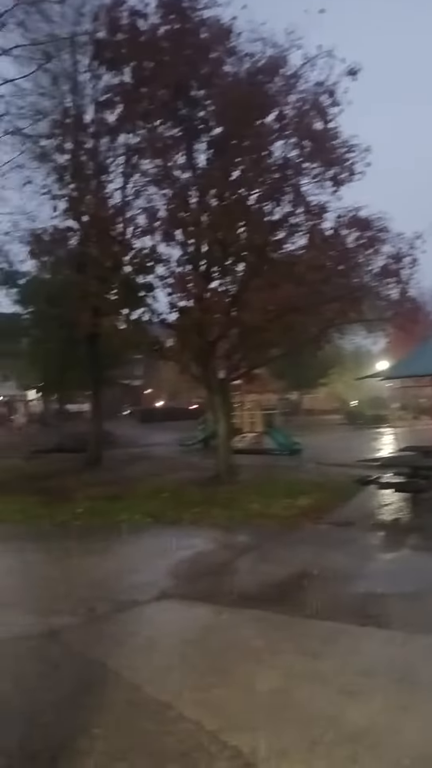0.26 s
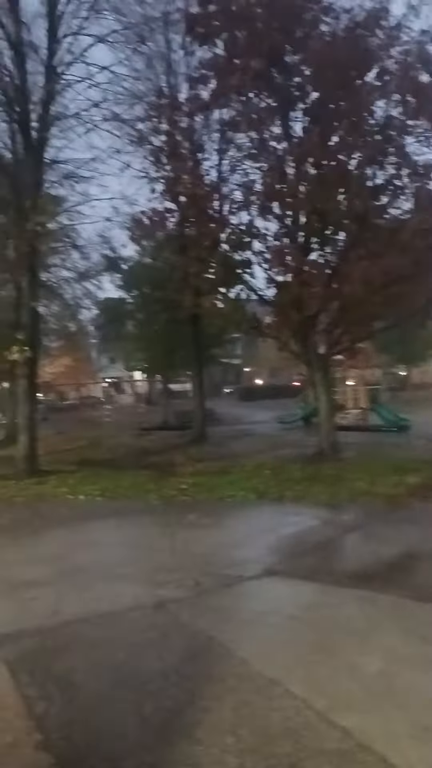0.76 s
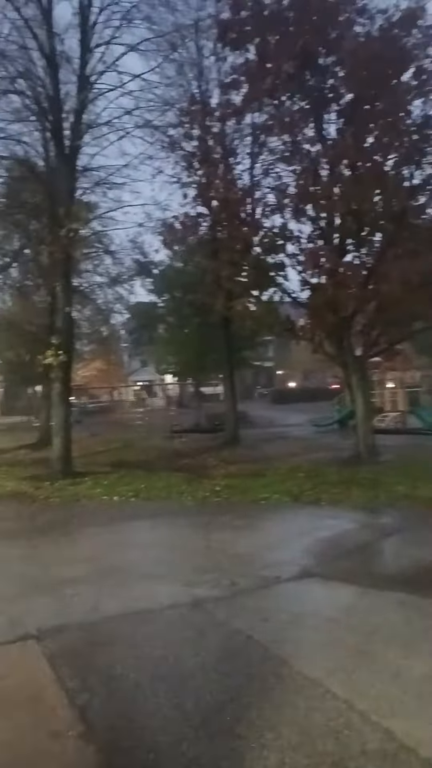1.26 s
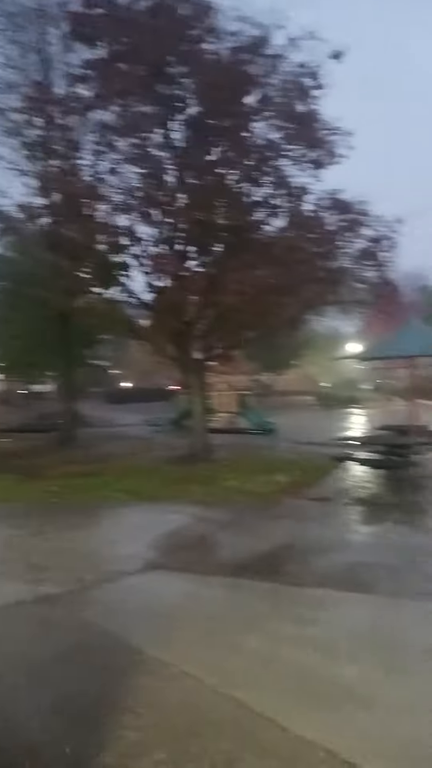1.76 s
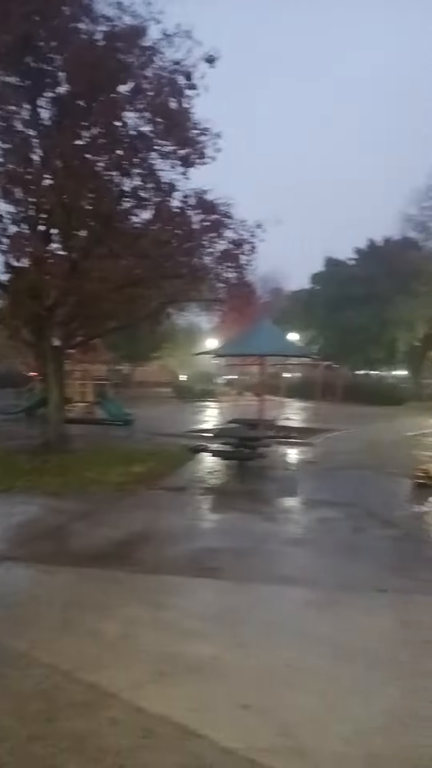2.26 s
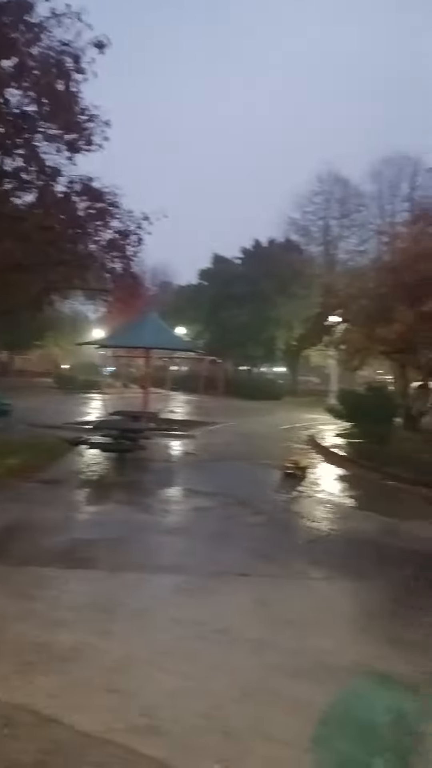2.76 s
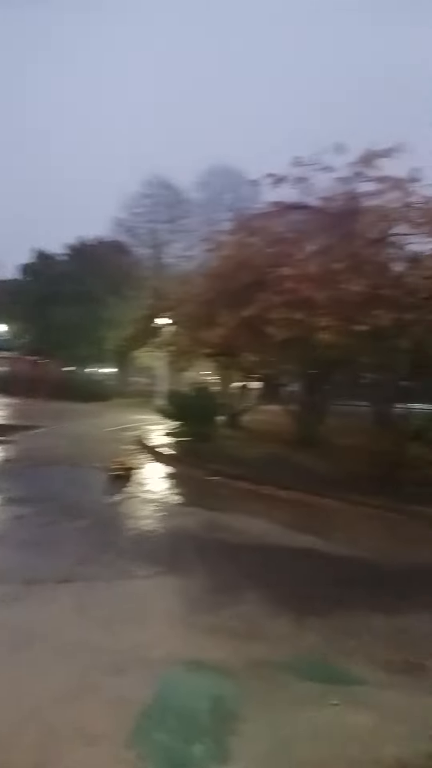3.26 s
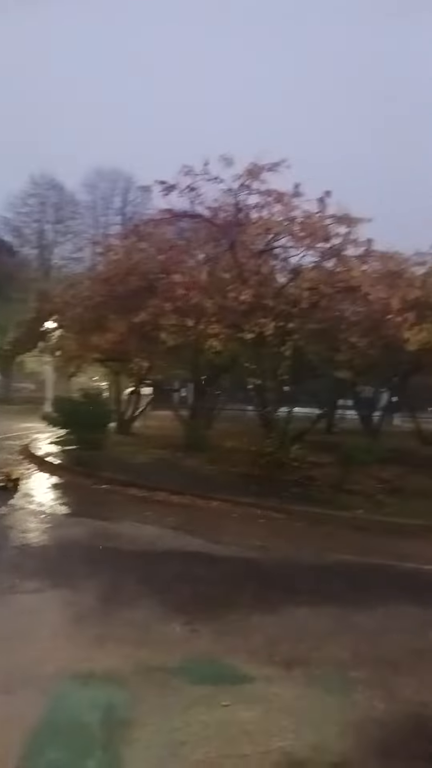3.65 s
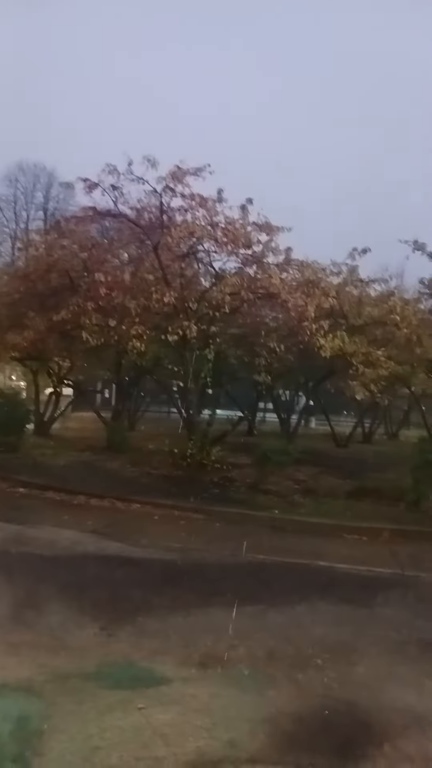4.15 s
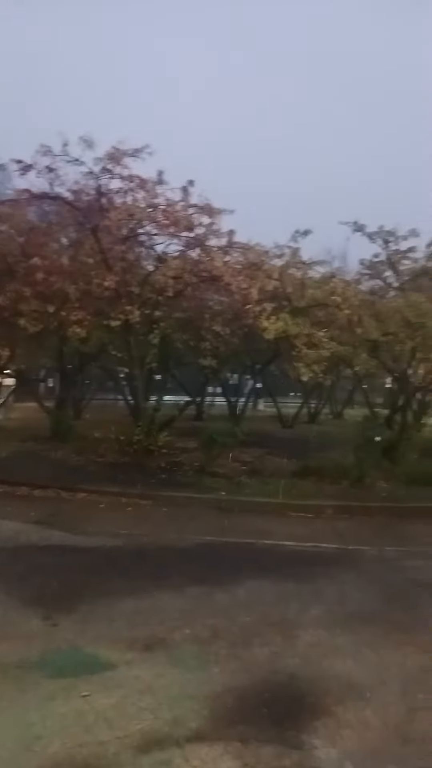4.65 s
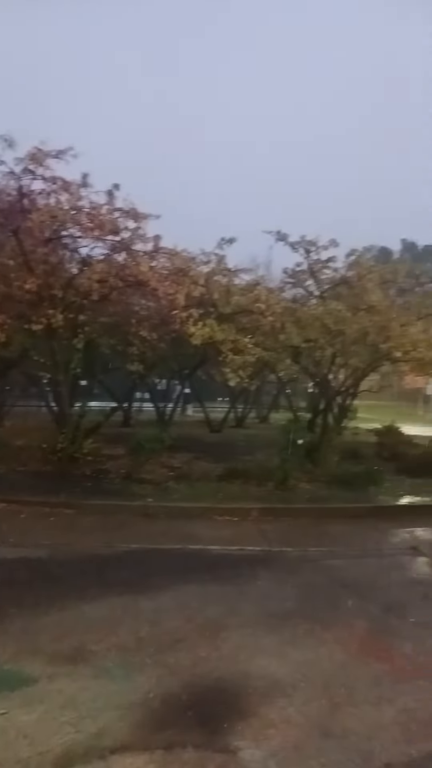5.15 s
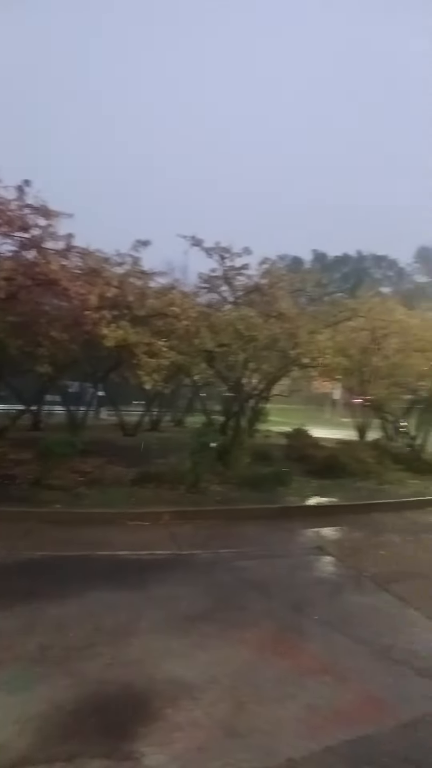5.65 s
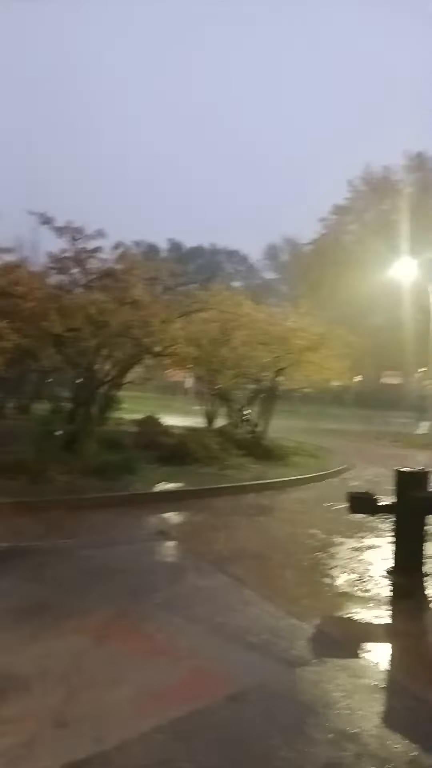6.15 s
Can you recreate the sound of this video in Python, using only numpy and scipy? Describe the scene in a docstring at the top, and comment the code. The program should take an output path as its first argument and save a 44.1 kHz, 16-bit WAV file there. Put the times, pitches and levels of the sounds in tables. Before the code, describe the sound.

Heavy rain falls on puddled park pavement as a continuous dense hiss, with fine patter and small crisp splashes nearby. A low rumble like distant traffic sways underneath. In the first second, a few drops strike the left microphone directly with sharp wet pops, briefly ducking the sound. That side has a ringing, slowly rising midrange tone; the right is more open. Light taps come later, then a hard knock near six seconds.

```python
"""Heavy rain on wet pavement

Rain falls in a park: noise for the far wash, ringing clicks for nearer drops, noise bursts for splashes.
Under it lies a low rumble like distant traffic, made of swaying low noise. The left microphone port is wet
and rings at a rising pitch; a few drops strike it directly and make the gain control duck. Near splashes
tick on the right, and a few taps, one of them hard, set the housing's modes ringing."""
import sys
import numpy as np
from scipy import signal
from scipy.fft import rfft, irfft
from scipy.io import wavfile
from scipy.ndimage import uniform_filter1d, minimum_filter1d

SR = 44100
rng = np.random.default_rng(int(sys.argv[2]) if len(sys.argv) > 2 else 0)


def generate_wav(sig):
    """Save sig (samples, or channels by samples) to the path in sys.argv[1] as 16-bit PCM at SR."""
    pcm = np.round(np.clip(np.atleast_2d(sig).T, -1, 1) * 32767).astype(np.int16)
    wavfile.write(sys.argv[1], SR, pcm)


N = 282240
TIME = np.arange(N) / SR
FREQS = np.maximum(np.fft.rfftfreq(N, 1 / SR), 1)  # Hz, kept above zero for logs and division


def from_db(db):
    """Decibels to gain."""
    return 10 ** (np.asarray(db) / 20)


def at_hz(table):
    """Spread each table column over all frequencies, interpolating on a log pitch axis."""
    hz, *columns = np.transpose(table)
    return np.array([np.interp(np.log(FREQS), np.log(hz), column) for column in columns])


def band(x, low_hz, high_hz, order=2):
    """Band-pass, its upper edge kept below the top of the spectrum."""
    edges = [low_hz, min(high_hz, .45 * SR)]
    return signal.sosfilt(signal.butter(order, edges, "band", fs=SR, output="sos"), x)


def drift(rate_hz):
    """Slow random wandering around zero with spread 1."""
    slow = irfft(rfft(rng.standard_normal(N)) / (1 + (FREQS / rate_hz) ** 2), N)
    return (slow - slow.mean()) / slow.std()


def ring(clicks, hz, t60):
    """A two-pole resonator: each unit click starts a sine of height 1 that falls 60 dB in t60 seconds."""
    radius = from_db(-60 / (t60 * SR))
    turn = 2 * np.pi * hz / SR
    poles = [1, -2 * radius * np.cos(turn), radius * radius]
    return signal.lfilter([0, np.sin(turn)], poles, clicks + 1e-18)  # tiny offset avoids denormals


def clicks_at(times, level_db):
    """Single-sample clicks at the given times in seconds."""
    out = np.zeros(N)
    out[np.round(np.asarray(times) * SR).astype(int)] = from_db(level_db)
    return out


# How alike the two ports hear the field: pitch_hz, correlation (0 to 1)
STEREO_LIKENESS = [(60, 0.96), (250, 1), (500, .62), (1000, .38), (2200, 0.23), (4000, 0.024)]


def coloured(white, spectrum, edge):
    """Two white signals become a stereo field: alike in the bass, unrelated in the treble."""
    angle = np.arcsin(np.clip(at_hz(STEREO_LIKENESS), 0, 1)) / 2
    bins = rfft(white)
    bins = np.cos(angle) * bins + np.sin(angle) * bins[::-1]  # bleed each side into the other
    return irfft(bins * from_db(at_hz(spectrum)) * edge, N) * np.sqrt(SR / 2)  # unit power to power per Hz


# Rumble colour, for unit-power noise before edges, sway and wet port:
# pitch_hz, left_db_per_hz, right_db_per_hz
RUMBLE_COLOUR = [(22, -61, -73), (34, -66, -63), (50, -49, -62), (68, -48, -56), (79, -58, -57),
                 (112, -53.5, -58.5), (153.6, -63.5, -64.5), (237, -67, -73.5)]


def rumble(sway_db=1.32, low_hz=27, high_hz=270):
    """Low-passed noise from far away: it sways slowly and swells gently once."""
    edge = 1 / np.sqrt((1 + (FREQS / high_hz) ** 8) * (1 + (low_hz / FREQS) ** 8))
    swell_at_s, swell_width_s, swell_peak_db = 2.55, 1.0, 1.5
    swell_db = swell_peak_db * np.exp(-((TIME - swell_at_s) / swell_width_s) ** 2)
    noise = coloured(rng.standard_normal((2, N)), RUMBLE_COLOUR, edge)
    return noise * from_db(swell_db + sway_db * drift(2.2))


# Blows on the housing, levels as fed to the resonators and filters:
# start_s, knock_db, deep_thump_db, contact_click_db, click_hz
TAP_BLOWS = [(1.887, -22, -25, -14, 700), (4.482, -20.5, -25, -14, 700), (6.0229, -15, -9.5, 13, 900),
             (6.0276, -12.5, -34, 12, 2900), (6.107, -19, -29, -14, 700), (6.320, -13, -21, -11, 700)]


def tap_clicks(span=2.27, right_db=-7.5, wet_low_hz=600, wet_high_hz=7500):
    """The contact of each tap sends a short click to both ports, duller on the wet side."""
    click = np.zeros(N)
    for s, _, _, click_db, hz in TAP_BLOWS:
        click += band(clicks_at(s, click_db), hz / span, hz * span, order=1)
    return np.array([band(click, wet_low_hz, wet_high_hz), from_db(right_db) * click])


# Ringing modes of the housing, on top of each knock's level: pitch_hz, level_db, t60_s
HOUSING_MODES = [(175, -12, .025), (295, 0.5, 0.043), (370, -1.5, 0.046), (705, -3, 0.0093),
                 (1150, -0.5, 0.0067)]


def taps(thump_t60=0.21, jolt_hz=200, jolt_db=14.0, right_db=-14.5):
    """Blows ring the housing; a heavy one jolts and shakes the whole body, pushing one port, pulling the other."""
    s, knock_db, thump_db, _, _ = np.transpose(TAP_BLOWS)
    knock = np.zeros(N)
    for k, (hz, mode_db, t60) in enumerate(HOUSING_MODES):
        knock += (-1) ** k * ring(clicks_at(s, knock_db + mode_db), hz, t60)  # modes alternate in sign
    push = clicks_at(s, thump_db)
    jolt = band(from_db(jolt_db) * ring(push, jolt_hz, 0.009), 86, 2500)
    shake = ring(push, 55, thump_t60) - ring(push, 68.5, thump_t60)  # two close modes swell, then die
    return (knock + jolt + shake) * np.array([[1], [-from_db(right_db)]])


def port_hz(s):
    """Pitch of the wet port: its water film settles quickly, then drains steadily, and the pitch rises."""
    start_hz, settle_hz, settle_s, creep_hz_per_s = 2094, 215, 0.85, 37
    return start_hz + settle_hz * (1 - np.exp(-s / settle_s)) + creep_hz_per_s * s


def cavity(x, hz, width_hz, size=256):
    """A resonant low-pass whose pitch may move from block to block."""
    radius = np.exp(-np.pi * width_hz / SR)
    out, state = np.zeros(N), np.zeros(2)
    for i in range(0, N, size):
        poles = [1, -2 * radius * np.cos(2 * np.pi * hz[i] / SR), radius * radius]
        out[i:i + size], state = signal.lfilter([sum(poles)], poles, x[i:i + size], zi=state)
    return out


def wet_port(x):
    """Water over the port rings in the midrange and muffles what lies above, up to the port's own high mode."""
    film = cavity(x, port_hz(TIME), width_hz=273)
    return cavity(film, np.full(N, 14500), width_hz=1900)


# Drops striking the left port, levels of the clicks before filtering: start_s, ring_db, crack_db
DIRECT_DROPS = [(.5450, 12, 2), (.7060, 14.5, -5), (0.8697, -1, -10), (1.2470, -5, -30)]


def port_drops(ring_t60=0.0095, halving_db=12.0, pitch_ratio=0.99, overtone_hz=4800, overtone_db=-13.0,
               overtone_growth=0.36, overtone_t60=0.0011, leak_db=-58.0):
    """A direct hit rings the wet port and its overtone under a tiny bright crack; the other port barely hears it.
    The harder the hit, the shorter and brighter the ring."""
    body, crack = np.zeros(N), np.zeros(N)
    for s, ring_db, crack_db in DIRECT_DROPS:
        click = clicks_at(s, ring_db)
        t60 = ring_t60 * .5 ** (ring_db / halving_db)
        overtone_gain = from_db(overtone_db + overtone_growth * ring_db)
        overtone = overtone_gain * ring(click, overtone_hz, overtone_t60)
        body += ring(click, pitch_ratio * port_hz(s), t60) - overtone
        crack += ring(clicks_at(s, crack_db), 14500, 0.00056)
    for _ in range(3):  # the tiny cavity passes almost nothing below its ring
        body = band(body, 1650, 8200)
    return (body + band(crack, 8600, 16000)) * from_db([[0], [leak_db]])


def patter(per_s, spread_db, cycles, count=18):
    """Random drops of uneven size; each rings a few cycles at one of many pitches, together roughly white."""
    out, pitches = np.zeros((2, N)), np.geomspace(700, 15000, count)
    for hz in pitches:
        share = np.sqrt(hz) / np.sqrt(pitches).sum()  # higher pitches get more drops
        born = rng.random((2, N)) < per_s * share / SR
        chance = rng.random((born.sum(), 2))
        size_db = spread_db * np.minimum(-np.log(chance[:, 0]), 4)
        clicks = np.zeros((2, N))
        clicks[born] = from_db(size_db) * np.sign(chance[:, 1] - .5)
        drops = ring(clicks, hz, cycles / hz)
        out += drops / drops.std() * np.sqrt(hz / pitches.sum())  # the pitches' powers add up to 1
    return out


def splashes(rows, span, t60, size=2048):
    """Each splash is a burst of spray that dies within milliseconds, heard a little differently at each port."""
    out = np.zeros((2, N + size))
    for s, level_db, hz in rows:
        burst = rng.standard_normal((2, size)) * from_db(level_db - 60 * TIME[:size] / t60)
        at = round(s * SR)
        out[:, at:at + size] += band(burst, hz / span, hz * span)
    return out[:, :N]


def spatter(level_db=4.5, spread_db=2.5, t60=0.025, left_db=-4.0, span=1.32, low_hz=2400, pitch_range=5.1,
            count=220):
    """Smaller splashes a few steps away: random band-passed bursts, more of them high than low."""
    when, size, pitch = rng.random((count, 3)).T
    hz = low_hz * pitch_range ** np.sqrt(pitch)
    level = level_db + spread_db * np.minimum(-np.log(size), 3.5)
    return splashes(np.column_stack([when * N / SR, level, hz]), span, t60) * from_db([[left_db], [0]])


# Rain colour, for unit-power noise before bass cut, flutter and wet port:
# pitch_hz, left_db_per_hz, right_db_per_hz
RAIN_COLOUR = [(324, -73.5, -71.5), (510, -71, -78), (930, -72.5, -73), (1150, -69.5, -74),
               (1500, -70, -70), (1940, -70, -65.5), (2380, -72.5, -72.5), (3640, -72.5, -74.5),
               (6140, -82, -81.5), (6970, -86.5, -79), (8500, -94, -89.5), (12470, -80, -79.5),
               (13700, -84, -83), (15600, -80, -81)]
# The closest splashes, before side trims and rain colour: start_s, level_db, centre_hz
CLOSE_SPLASHES = [(.3198, 21.5, 11000), (.6384, 22.5, 8950), (1.5335, 13, 15000), (1.9975, 14, 14500),
                  (2.2257, 20, 7800), (2.6090, 17, 7000), (3.2372, 18, 13000), (3.4335, 13, 4120),
                  (5.4168, 17.5, 13500), (5.6335, 16, 13000), (6.0995, 15, 15000)]


def rain(near_db=-6.5, far_db=-0.08, flutter_db=0.44, shimmer_db=1.14, close_left_db=8.0, close_right_db=3.0,
         low_hz=270):
    """Far drops merge into a wash whose treble shimmers; nearer ones stay separate ticks and splashes."""
    near = from_db(near_db) * patter(per_s=2600, spread_db=4.0, cycles=4.1)
    far = from_db(far_db) * rng.standard_normal((2, N))
    treble = irfft(rfft(far) / (1 + (4000 / FREQS) ** 4), N)
    far = far + treble * (from_db(shimmer_db * drift(17)) - 1)
    close = splashes(CLOSE_SPLASHES, span=1.46, t60=.011)  # spray reaches span times above and below its centre
    close = close * from_db([[close_left_db], [close_right_db]]) + spatter()
    # all drops take on the colour of the ground and the ports; rain has no bass
    bass_cut = 1 / np.sqrt(1 + (low_hz / FREQS) ** 8)
    return coloured(near + far + close, RAIN_COLOUR, bass_cut) * from_db(flutter_db * drift(9.5))


def scene():
    """Everything in the air, and the contact clicks of the taps, reach the left side through the wet port;
    direct hits and the housing's ringing bypass it."""
    left, right = rain() + rumble() + tap_clicks()
    return np.array([wet_port(left), right]) + port_drops() + taps()


def released(cut_db, db_per_s):
    """A gain cut that lets go at a steady rate."""
    return np.maximum.accumulate(cut_db + db_per_s * TIME) - db_per_s * TIME


def gain_control(x, ceiling_db=0.0, fast_db_per_s=75, held_db=3.5, hold_s=1.16, slow_db_per_s=7.5, size=45):
    """Overloads duck the gain at once; most of it returns quickly, the last few dB only after a hold."""
    over_db = np.maximum(20 * np.log10(np.abs(x).max(axis=0) + 1e-9) - ceiling_db, 0)
    over_db = -minimum_filter1d(-over_db, 2 * size)  # widen each peak to about 2 ms
    half = int(hold_s * SR / 2)
    held = -minimum_filter1d(-np.minimum(over_db, held_db), 2 * half + 1, origin=half, mode="constant")
    cut_db = np.maximum(released(over_db, fast_db_per_s), released(held, slow_db_per_s))
    return x * from_db(-uniform_filter1d(cut_db, size))


def record(dry):
    """Gain control on both sides together, then a steep low-pass on the top."""
    top = signal.ellip(12, .1, 70, 15900, fs=SR, output="sos")  # ripple and stop-band in dB, cutoff in Hz
    return signal.sosfilt(top, gain_control(dry))


dry = scene()
out = record(dry)
generate_wav(out)
```